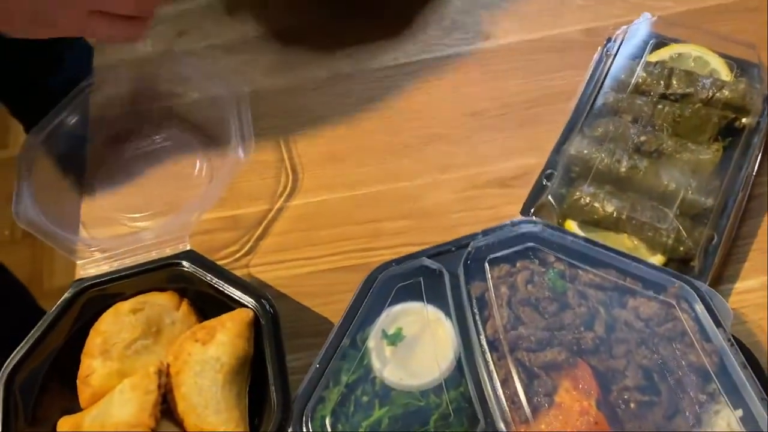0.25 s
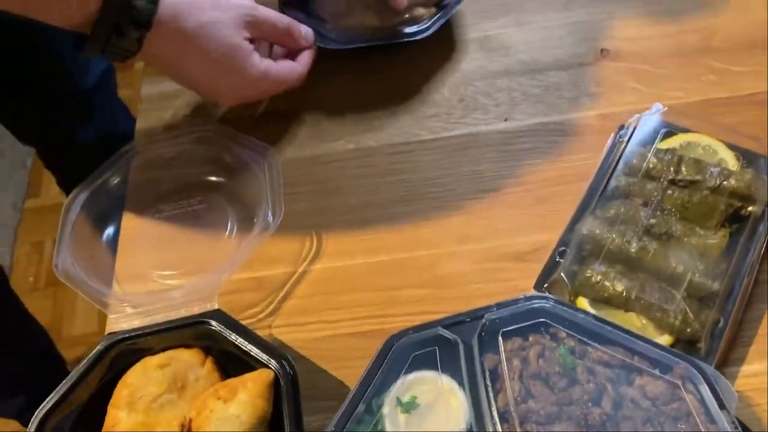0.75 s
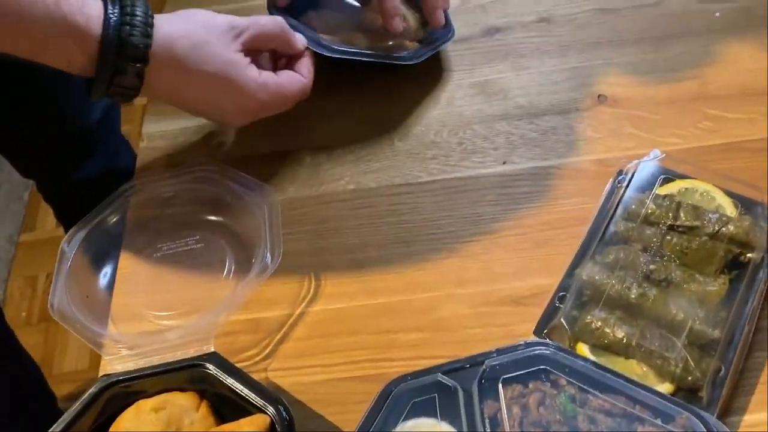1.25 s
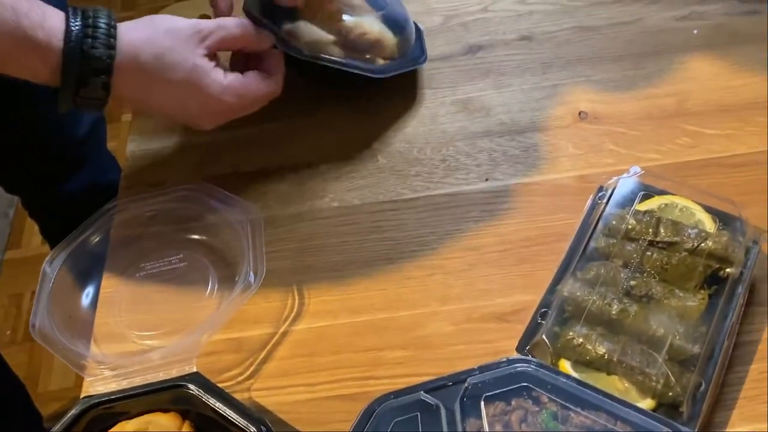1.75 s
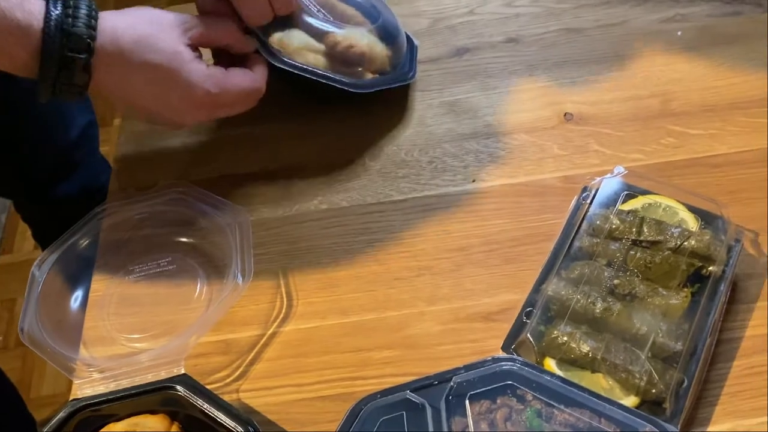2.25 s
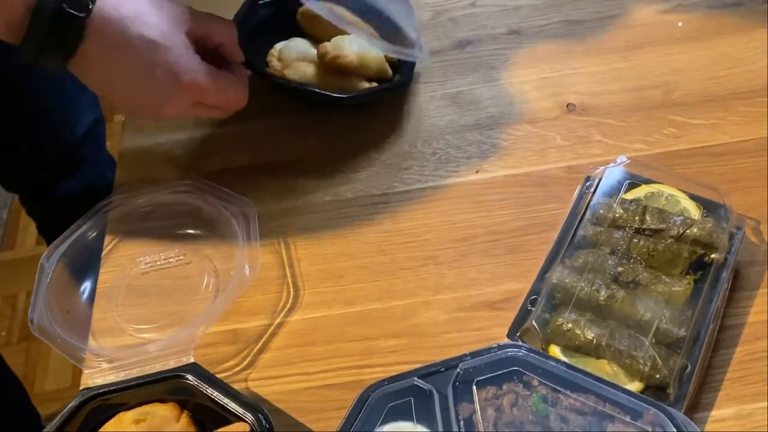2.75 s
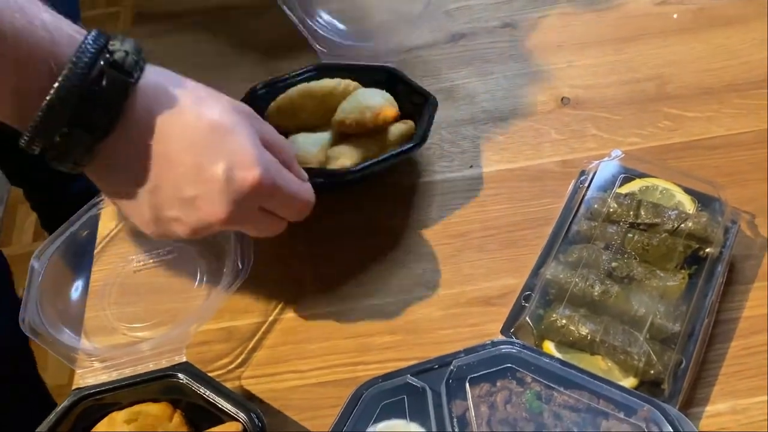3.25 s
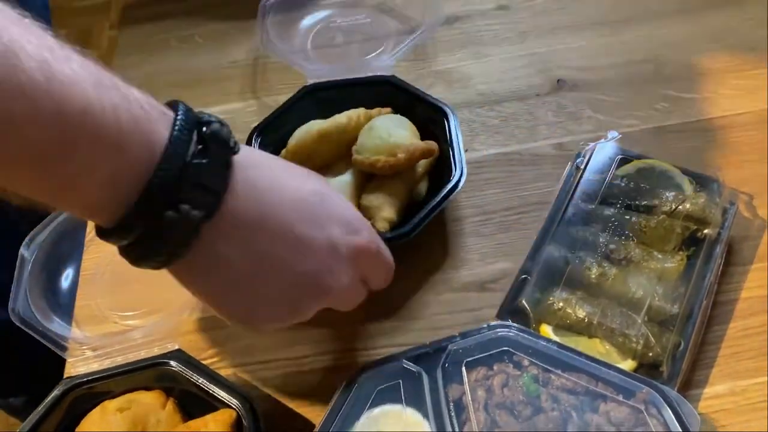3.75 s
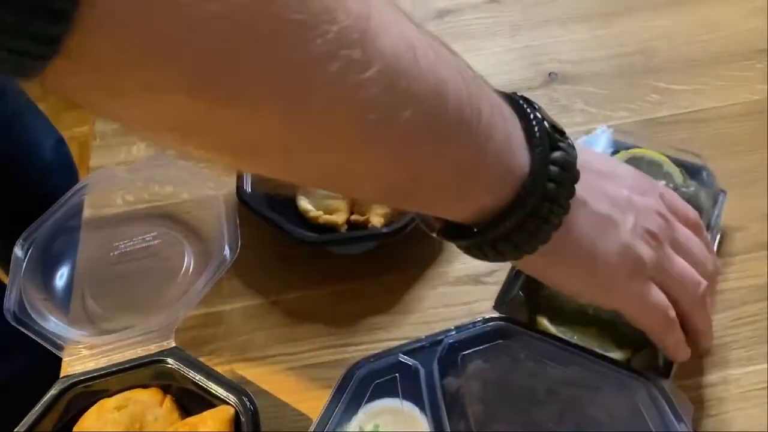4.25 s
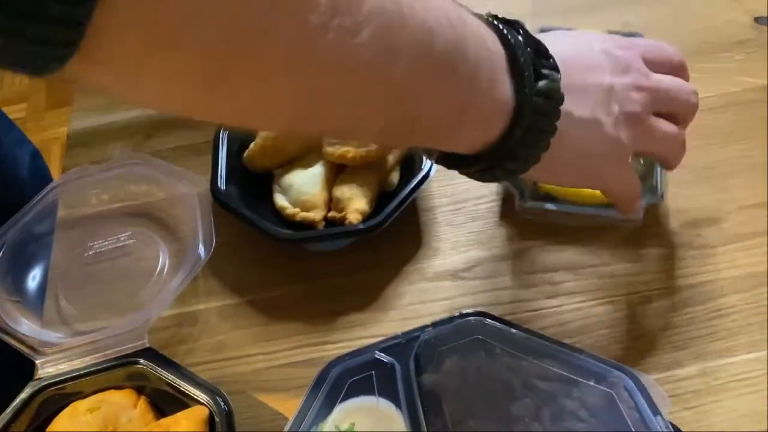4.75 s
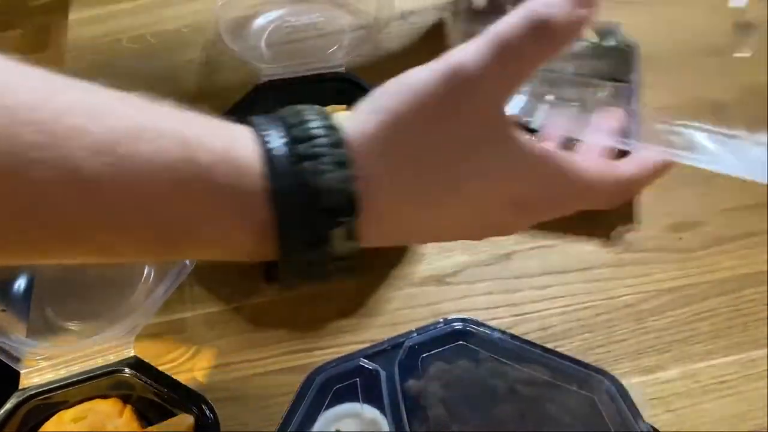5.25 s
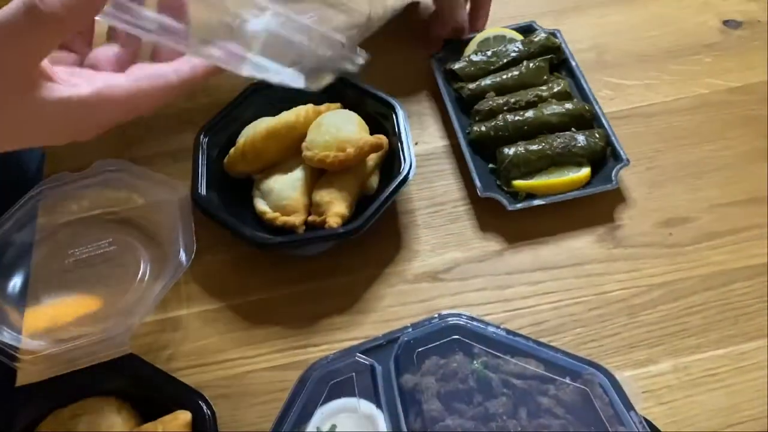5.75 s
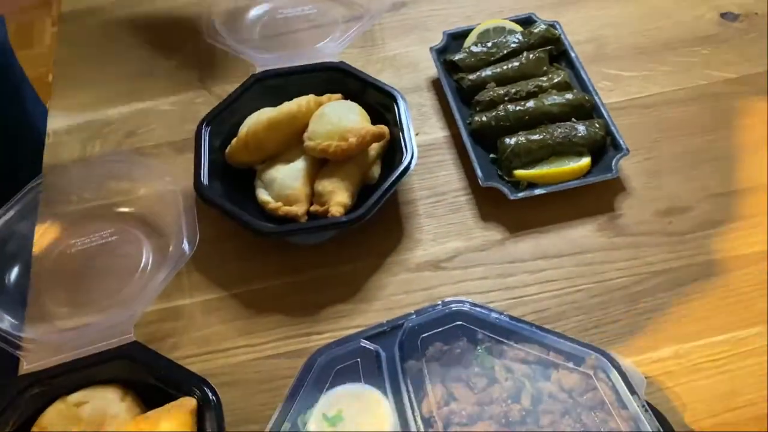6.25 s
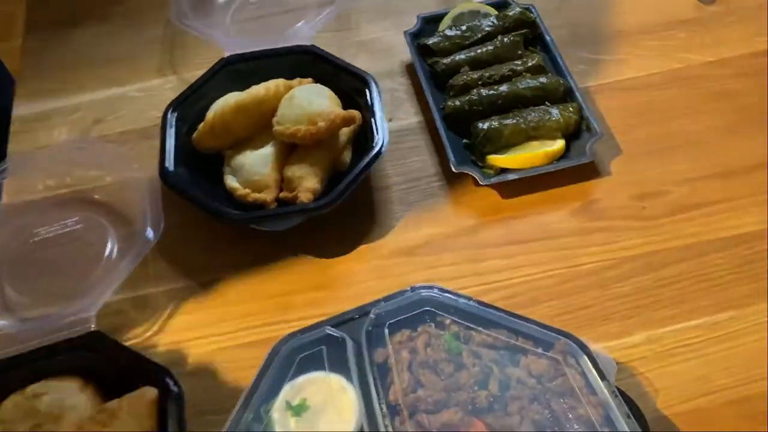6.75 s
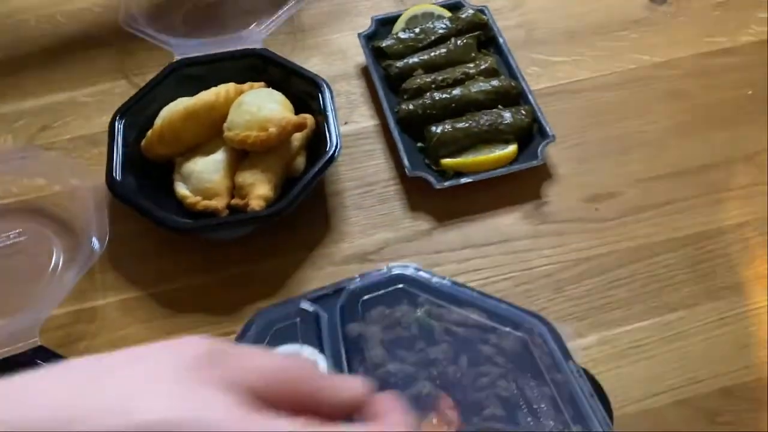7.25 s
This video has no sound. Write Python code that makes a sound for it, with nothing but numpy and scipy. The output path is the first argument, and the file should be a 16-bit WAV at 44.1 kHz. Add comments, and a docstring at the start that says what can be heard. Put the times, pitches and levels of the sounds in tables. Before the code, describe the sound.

Thin plastic food boxes crackle, snap open and knock on a wooden table, heard close in a quiet room.

```python
"""In a living room, thin plastic food boxes are slid, squeezed and opened on a wooden table.
Boxes thud on the table top and rub over the wood in many tiny slips; the plastic knocks, creaks
and sings. Lids buckle under a thumb and snap free, and a dropped lid bounces. Each blow sets
the thin plastic ringing. Two close microphones pick it all up over a faint room hush."""
import sys
import numpy as np
from scipy import signal
from scipy.fft import rfft, irfft, next_fast_len
from scipy.io import wavfile
from scipy.ndimage import uniform_filter1d

SR = 44100
rng = np.random.default_rng(int(sys.argv[2]) if len(sys.argv) > 2 else 0)


def unload_wav(signal):
    """Save mono or channel-first audio to the path in sys.argv[1] as 16-bit WAV at rate SR, clipped to [-1, 1]."""
    wavfile.write(
        sys.argv[1],
        SR,
        np.round(np.clip(np.atleast_2d(signal).T, -1, 1) * 32767).astype(np.int16),
    )


N = 330608


def from_db(db):
    """Turn decibels into a gain."""
    return 10 ** (np.asarray(db) / 20)


def rms_one(x):
    """Scale a signal so its average strength (rms) is 1."""
    return x / np.sqrt(np.mean(x ** 2) + 1e-20)


def peak_one(x):
    """Scale a signal so its highest peak is 1."""
    return x / (np.abs(x).max() + 1e-20)


def at_hz(points, hz):
    """Read between a table's rows, with octaves about evenly spaced."""
    points = np.array(points, float)
    return np.interp(np.log(hz + 1), np.log(points[:, 0] + 1), points[:, 1])


def high_pass(x, hz, order=2):
    """Turn down everything below hz."""
    return signal.sosfilt(signal.butter(order, hz, "high", fs=SR, output="sos"), x)


def coloured(x, spectrum):
    """Shape a signal's tone with a table of frequencies and levels."""
    log_gain = np.log(from_db(at_hz(spectrum, np.fft.rfftfreq(8192, 1 / SR))))
    cepstrum = irfft(log_gain)
    cepstrum[1:4096] *= 2   # folded so the filter never sounds ahead of its input
    cepstrum[4097:] = 0
    return signal.fftconvolve(x, irfft(np.exp(rfft(cepstrum))))[:len(x)]


def ring(x, hz, t60):
    """Let x set one pitch ringing; t60 is the ring time, the seconds it takes to fade by 60 dB."""
    decay = from_db(-60 / (max(t60, .002) * SR))
    step = 2 * np.pi * hz / SR
    return signal.lfilter([0, np.sin(step)], [1, -2 * decay * np.cos(step), decay * decay], x + 1e-18)


def add(track, s, sound):
    """Mix a sound into the track, starting at s seconds."""
    i = int(s * SR)
    track[i:i + len(sound)] += sound[:N - i]


def opposed(x, share):
    """Widen the sound: a weak copy without bass, upside down on the right."""
    return share * high_pass(x, 240) * np.array([[1], [-1]])


# Notes of the table top, the box hollows and a loose lid, by name: f/Hz, ring time/s
BODY_NOTES = {"deep": (46, 0.2), "low": (64, 0.079), "middle": (119, 0.14), "high": (248, 0.19),
              "thump": (185, 0.09), "hollow": (335, 0.061), "box": (310, 0.19), "tub": (390, 0.16),
              "rim": (550, 0.1), "lid": (2250, 0.15), "flap": (2430, 0.2)}
# Boxes set down or pressed, and what rings on: t/s, level/dB, note name
BOOMS = [(0.17, -27.5, "hollow"), (0.525, -25, "hollow"), (0.46, -32.5, "middle"), (0.511, -20.5, "middle"),
         (0.549, -17.5, "middle"), (0.599, -20.5, "deep"), (0.61, -32, "middle"), (0.701, -26.5, "deep"),
         (0.58, -23, "high"), (1.538, -33.5, "high"), (1.71, -36, "high"), (1.757, -32, "high"),
         (2.12, -24, "box"), (0.999, -33.5, "high"), (0.812, -37.5, "rim"), (2.135, -35, "flap"),
         (2.25, -34.5, "flap"), (2.24, -27, "tub"), (3.682, -35, "deep"), (3.788, -35.5, "middle"),
         (3.851, -34, "deep"), (0.0, -25, "deep"), (2.164, -23.5, "box"), (2.349, -19, "hollow"),
         (2.116, -22, "lid"), (2.234, -22.5, "lid"), (2.6, -8, "hollow"), (2.599, -14, "thump"),
         (4.278, -35.5, "deep"), (4.3, -30, "hollow"), (4.34, -29, "hollow"), (4.754, -12.5, "hollow"),
         (4.761, -15, "thump"), (4.79, -25, "middle"), (4.782, -16, "deep"), (5.467, -23.5, "low"),
         (5.727, -33.5, "low"), (6.603, -32, "middle"), (6.699, -30, "high"), (7.307, -25, "high")]

def booms():
    """A soft push sets table top, box or lid swinging at one pitch; loose contact makes it uneven."""
    out, t = np.zeros(N), np.arange(20000) / SR
    swell_cycles, uneven_db = 0.88, 2.5
    for s, db, note in BOOMS:
        hz, t60 = BODY_NOTES[note]
        smoothing = int(min(2.7 / hz, .05) * SR) + 40
        wobble = rms_one(uniform_filter1d(rng.standard_normal(len(t)), size=smoothing))
        level = from_db(db - 60 * t / t60 + uneven_db * wobble)
        swell = 1 - np.exp(-t * hz / swell_cycles)
        add(out, s, level * swell * np.sin(2 * np.pi * hz * t))
    return out


# Notes of the thin box walls: f/Hz, level/dB, ring time/s (capped at 0.03 below)
WALL_NOTES = [(600, -19.5, 0.019), (690, -10, 0.036), (823, 7, 0.015), (1177, 16, 0.006),
              (1337, 16.5, 0.0053), (1540, 9, 0.0034), (1654, 8, 0.0049), (2175, 11, 0.0027),
              (2240, -5.5, 0.0033), (2880, 7.5, 0.003), (3303, 9, 0.0052), (3635, 2, 0.00612)]

def box_walls(push, chance):
    """The walls ring at many notes; two rows of chance vary their strength and, like a grip, pitch."""
    scatter_db, bend = 1.2, .07
    out = 0
    for k, (hz, db, t60) in enumerate(WALL_NOTES):
        gain = (-1) ** k * from_db(db + scatter_db * chance[0, k])
        out = out + gain * ring(push, hz * (1 + bend * chance[1, k]), min(t60, .03))
    return out


# Tone of the rumbling wood: f/Hz, level/dB
WOOD_TONE = [(18, -60.5), (30, -5.5), (86, -9.5), (247, -5.5), (524, -4), (700, -8), (910, -17),
             (1540, -120)]
# Tone of fingers hissing over plastic: f/Hz, level/dB
FINGER_TONE = [(1400, -30), (2800, 1.5), (4300, 1), (5400, 4), (7300, -5), (9500, -3.5), (13500, -7),
               (17000, -17)]
# Rubs and creases: start t/s, end t/s, first level/dB, last level/dB, panel f/Hz,
# wood level/dB, finger level/dB (these two relative to the stroke)
STROKES = [(0, 0.095, -26, -33, 1770, -5.5, -10.5), (0.115, 0.472, -32.5, -60.5, 1216, -4, -7),
           (0.458, 0.706, -51.5, -51.5, 900, 5, -7), (0.72, 0.9, -57.5, -53.5, 2460, -1.5, -6.5),
           (0.911, 1, -51.5, -55, 1410, 4, -10), (0.997, 2.11, -53, -55.5, 2270, -4, -8),
           (1.64, 1.689, -43, -45, 860, -5, -3.5), (1.714, 1.756, -46.5, -33.5, 800, -17, -14.5),
           (2.127, 2.58, -29, -63.5, 2500, -16.5, -18), (2.922, 3.218, -58, -46.5, 2500, -20, -4),
           (1.166, 1.199, -35, -50, 925, -13, -33), (3.309, 3.459, -44, -56.5, 2120, -11, -1.5),
           (3.464, 3.544, -60, -55.5, 2295, -24, -1.5), (3.551, 3.69, -46.5, -57.5, 2220, -16.5, -3),
           (4.195, 4.27, -47, -56.5, 1400, -1.5, -8.5), (4.256, 4.358, -47.5, -37.5, 1430, -3, -2.5),
           (4.362, 4.435, -37.5, -37.5, 754, -6, -6), (4.43, 4.578, -40, -55, 1560, -8.5, 2.5),
           (4.543, 4.613, -33, -51.5, 1032, -7, -9.5), (4.564, 4.751, -38.5, -46.5, 1254, -7.5, -7.5),
           (5.333, 5.42, -58.5, -51.5, 3100, -13.5, -4.5), (5.428, 5.495, -47, -47.5, 2240, -23.5, -8),
           (5.398, 5.703, -58, -64, 5286, -16, 4), (5.503, 5.716, -55.5, -61, 1816, -19, 0),
           (6.667, 7.004, -69, -52, 2420, -1.5, -16), (6.084, 6.194, -57.5, -66, 2780, -3, -9.5),
           (7.025, 7.104, -44, -41.5, 790, -6, -6.5), (7.136, 7.303, -52.5, -44.5, 770, 10, -0.5),
           (7.306, 7.517, -42, -49.5, 770, 10.5, -5.5)]

def rubbing(rattle_strokes):
    """Tiny slips shake the walls and the panel (the plastic under the hand); wood rumbles, skin hisses."""
    slips_per_s, ring_cycles = 1500, 13
    sizes = from_db(0.82 * np.minimum(rng.exponential(1, N), 5)) * rng.choice([-1, 1], N)
    surges = rms_one(uniform_filter1d(rng.standard_normal(N), size=900))   # the grip catches and lets go
    slips = rms_one(sizes * (rng.random(N) < slips_per_s / SR) * from_db(1.6 * surges))
    walls = rms_one(high_pass(box_walls(slips, np.zeros((2, len(WALL_NOTES)))), 490))
    rumble = rms_one(coloured(rng.standard_normal(N), WOOD_TONE))
    skin = rms_one(coloured(rng.standard_normal(N) * from_db(2.0 * surges) + 0.061 * slips, FINGER_TONE))
    out = np.zeros(N)
    # Rattles swell faster than rubs and leave the table's bass still.
    for strokes, swell_s, bass_cut_hz in [(STROKES, 0.02, 40), (rattle_strokes, 0.0035, 130)]:
        for start, end, first_db, last_db, hz, wood_db, finger_db in strokes:
            t = np.arange(-.006, max(end - start, .01) + 0.022, 1 / SR)
            part = slice(int(start * SR), int(start * SR) + len(t))
            t = t[:len(slips[part])]
            level = from_db(np.interp(t, [0, end - start], [first_db, last_db]))
            fade_in = (t - t[0]) / swell_s if start > .01 else 1
            fades = np.clip(np.minimum(fade_in, (t[-1] - t) / 0.027), 0, 1)
            panel = rms_one(high_pass(ring(slips[part], hz, ring_cycles / hz), 0.42 * hz))
            upper_walls = high_pass(high_pass(walls[part], 0.43 * hz), 0.43 * hz)
            wood = from_db(wood_db) * high_pass(rumble[part], bass_cut_hz)
            mix = 0.7 * panel + 0.59 * upper_walls + wood + from_db(finger_db) * skin[part]
            add(out, max(start - .006, 0), level * fades * mix)
    return out


# Singing plastic, one list of points for each sound: t/s, level/dB, f/Hz
SINGING_CURVES = [
    [(0, -27, 1080), (0.07, -29.5, 1190), (0.11, -37, 1150), (0.26, -56, 1100)],
    [(2.99, -67, 1850), (3.05, -49, 2050), (3.12, -51, 2350), (3.17, -47.5, 2150), (3.205, -43, 1850),
     (3.24, -61, 1800)],
]
# The bands it sings in: multiple of the pitch, level/dB
SINGING_BANDS = [(1, 1), (1.85, -7.5), (2.8, -12)]

def singing_plastic():
    """Plastic sings in narrow bands of noise: a fading ring at the start, later a gliding scrape."""
    out = np.zeros(N)
    half_width = 0.108   # as a share of the band's pitch
    for points in SINGING_CURVES:
        s, db, hz = np.transpose(points)
        t = np.arange(s[0], s[-1], 1 / SR)
        phase = 2 * np.pi * np.cumsum(np.interp(t, s, hz)) / SR
        for multiple, band_db in SINGING_BANDS:
            blur = signal.butter(2, half_width * multiple * hz.mean(), fs=SR, output="sos")
            sway = rms_one(signal.sosfilt(blur, rng.standard_normal((2, SR)))[:, -len(t):])
            band = sway[0] * np.cos(multiple * phase) + sway[1] * np.sin(multiple * phase)
            add(out, s[0], from_db(np.interp(t, s, db) + band_db) * band)
    return out


# Tone of the quiet room: f/Hz, level/dB
HUSH_TONE = [(25, -23), (45, -0.5), (160, 0.5), (500, -14), (900, -18), (2500, -27), (6000, -37.5),
             (10000, -37), (17000, -43)]
# Faint steady whines in it: f/Hz, level/dB
WHINES = [(830, -75.5), (1700, -83)]

def hush():
    """Steady low room noise with a faint whine, nearly alike left and right."""
    common, opposite = (rms_one(coloured(rng.standard_normal(N), HUSH_TONE)) for _ in range(2))
    noise = rng.standard_normal(N)
    whine = sum(from_db(db) * rms_one(ring(noise, hz, t60=0.82)) for hz, db in WHINES)
    return from_db(-56) * (common + opposed(opposite, 0.077)) + whine


# Tone of the bright crack of plastic: f/Hz, level/dB
CRACK_TONE = [(700, -41.5), (2000, -7.5), (3800, 11.5), (5200, 16.5), (7300, 6), (10000, 4.5),
              (12000, -1.5), (13500, 1.5), (15200, -10.5), (17000, -16)]

def blow(hz, crack_db, contact_ms, thud_db):
    """One click with ragged aftershocks drives the panel, the walls, a brief crack and a low thud."""
    ms = np.arange(4000) / SR * 1000
    fading = np.exp(-ms / contact_ms)
    hardness = from_db(0.3 * min(crack_db, 0))   # soft blows swell slowly and mostly wake the panel
    crispness = min(3.17 / contact_ms, 1) ** 2   # past 3.17 ms, a click turns into a crunch
    swell = np.minimum(ms * hardness * crispness / 0.28, 1)
    push = rng.standard_normal(len(ms)) * swell * fading
    push[20] += 8.8 * (hardness * crispness) ** 2   # the click itself
    contact = high_pass(push, 250)
    panel = peak_one(high_pass(ring(contact, hz, 3.6 / hz / hardness), 0.74 * hz))
    wall_push = high_pass(contact, .62 * hz, order=6)   # a small panel wakes no deep notes
    walls = peak_one(box_walls(wall_push, rng.standard_normal((2, len(WALL_NOTES)))))
    crack = peak_one(coloured(contact * (fading ** 0.3 + 0.5 * fading ** 1.6), CRACK_TONE))
    thud = peak_one(ring(ring(high_pass(push, 150), 400, 0.0018), 290, 0.0028))
    plastic = 0.61 * panel + 1.245 * hardness ** 2 * walls + from_db(crack_db) * crack
    return plastic + from_db(thud_db) * thud


# Knocks, crunches and creaks: t/s, level/dB, panel f/Hz, crack level/dB, contact time/ms
KNOCKS = [(0.456, -33.5, 634, -63, 3.5), (0.48, -32.5, 825, -19, 1.9), (0.142, -33, 4380, -8, 3.3),
          (0.207, -24.5, 2250, -15, 17), (0.5, -40.5, 1490, -0.5, 10.6), (0.978, -21.5, 1490, -20, 14),
          (0.995, -8, 880, -25, 1.4), (1.364, -14, 760, -22, 0.53), (2.233, -10, 840, -22.5, 4.6),
          (2.118, -8.5, 770, 6, 3.6), (2.164, -11, 1700, 3.5, 3), (2.244, -18.5, 2220, 9.5, 4.3),
          (2.351, -10.5, 2120, 3.5, 3.63), (2.352, -13.5, 810, -25, 2.2), (2.363, -26, 2370, -41, 4.5),
          (2.57, -28.5, 790, -8, 14), (2.598, -12.5, 1760, 5.5, 7.1), (2.602, 0.5, 486, -18, 8.2),
          (2.611, -13.5, 1330, -2, 19.6), (2.623, -4, 786, -26, 1.8), (2.636, -20.5, 846, -4, 18),
          (2.721, -7.5, 2090, -7, 11), (2.728, -4.5, 4850, -15.5, 5.5), (3.305, -29, 1840, -53.5, 4.3),
          (3.661, -21.5, 3080, -23, 14), (4.206, -24.5, 993, -15, 7.1), (4.301, -24, 1240, -16.5, 1.7),
          (4.331, -49, 1890, -16, 3.5), (4.367, -27, 1850, -16, 6.2), (4.446, -21, 1890, -14.5, 4.8),
          (4.453, -20.5, 2080, -13, 1.6), (4.461, -21, 1640, -10, 4.4), (5.149, -55.5, 2580, 2, 8.7),
          (5.537, -39, 5340, -8, 5.1), (5.616, -39, 1080, -19, 3.4), (6.585, -30, 2470, -24.5, 4.9),
          (6.728, -35, 2950, 0, 4.3), (7.307, -25, 700, -19, 5.5), (4.723, -9.5, 1010, -22.5, 10.7),
          (4.73, -10, 860, -26, 1.7), (4.755, -4, 870, -12, 3.1), (4.763, -5.5, 1220, -51.5, 3.9),
          (5.258, -40.5, 625, -24, 8), (6.097, -48, 2680, 1.5, 8.3), (6.344, -48.5, 1060, 1, 10.3),
          (6.592, -3.5, 1410, -12.5, 5), (6.592, -16.5, 3150, -25.5, 12.7), (6.602, -8.5, 2400, -25, 7.6),
          (6.612, -10, 1480, -32, 6.8), (6.681, -17.5, 2500, -18, 9), (6.756, -32.5, 2260, -10.5, 14),
          (6.841, -21, 2730, -11.5, 6.6), (6.935, -32.5, 4300, 7.5, 9.2), (7.029, -21.5, 596, -36, 1.5),
          (7.049, -26, 704, -30, 3.3), (7.089, -24.5, 2330, 4, 3.9), (7.151, -25, 1770, -5.5, 8.9),
          (7.262, -24.5, 1410, -20, 11.4), (7.357, -31.5, 600, 6.5, 5.2)]

def knocks_and_creaks():
    """Plastic knocks, crunches, or creaks briefly just before a snap, each with a low thud."""
    out = np.zeros(N)
    for s, db, hz, crack_db, contact_ms in KNOCKS:
        add(out, s, from_db(db) * blow(hz, crack_db, contact_ms, thud_db=-15.5))
    return out


def rattles(blows, relative_db):
    """Loose plastic rattles on after each blow; returns fading strokes for rubbing() to play."""
    fade_db, wood_db, finger_db = -47, 2, -10
    return [(s + 0.0056, s + 0.32, db + relative_db, db + relative_db + fade_db, hz, wood_db, finger_db)
            for s, db, hz, *_ in blows]


# A lid giving way: t/s, level/dB
BUCKLES = [(0.92, -36), (1.038, -24), (1.203, -29.5), (1.482, -14), (1.491, -11), (1.501, -11.5),
           (1.852, -13), (1.961, -28), (2.076, -19.5), (2.094, -16.5), (2.105, -11.5), (2.465, -32.5),
           (4.366, -27)]

def buckles():
    """A lid panel buckles softly under the thumb."""
    out = np.zeros(N)
    for s, db in BUCKLES:
        add(out, s, from_db(db) * blow(hz=905, crack_db=-22, contact_ms=6.5, thud_db=-44))
    return out


# A lid rim letting go: t/s, level/dB, panel f/Hz, crack level/dB
SNAPS = [(0.991, -6, 2040, 4.5), (1.158, -37.5, 3540, 9), (1.26, -56.5, 3970, 12.5), (1.29, -43.5, 670, 18),
         (1.353, -6, 1120, 5), (1.866, -6, 1170, 0.5), (2.233, -6.5, 5060, -11), (3.674, -4, 2790, 0),
         (5.36, -43, 2220, 17)]

def snaps():
    """A lid rim snaps free in the hand, with a sharp crack and hardly any thud."""
    out = np.zeros(N)
    for s, db, hz, crack_db in SNAPS:
        add(out, s, from_db(db) * blow(hz, crack_db, contact_ms=2.5, thud_db=-34.5))
    return out


# Landings of a dropped lid: t/s, level/dB
BOUNCES = [(3.786, -14.5), (3.848, -14.5), (3.888, -18), (3.917, -27)]

def bounces():
    """A dropped lid bounces on its rim in short taps that come ever closer together."""
    out = np.zeros(N)
    for s, db in BOUNCES:
        add(out, s, from_db(db) * blow(hz=1890, crack_db=-13, contact_ms=1.6, thud_db=-18.5))
    return out


# How long the room rings: f/Hz, ring time/s
ROOM_RING = [(100, 0.65), (300, 0.41), (800, 0.22), (2000, 0.39), (5000, 0.16), (13000, 0.13)]

def room(x):
    """Echoes off the room's walls blur into a tail of noise, each octave dying at its own pace."""
    t, edges_hz = np.arange(SR // 2) / SR, 60 * 2.0 ** np.arange(9)
    tail = 0
    for low, high in zip(edges_hz, edges_hz[1:]):
        octave = signal.butter(2, [low, high], "band", fs=SR, output="sos")
        band = signal.sosfilt(octave, rng.standard_normal((2, len(t))))
        tail = tail + band * from_db(-60 * t / at_hz(ROOM_RING, np.sqrt(low * high)))
    tail *= np.clip((t - .004) / 0.00087, 0, 1)   # the first wall is a few milliseconds away
    tail /= np.sqrt(np.sum(tail[0] ** 2))
    common, opposite = signal.fftconvolve(x[None], tail, axes=1)[:, :N]
    return from_db(-14) * (common + opposed(opposite, .65))


def scene():
    """Add up the boxes on the table, their echo and the room's hush."""
    rattle_strokes = rattles(KNOCKS, relative_db=-35.5) + rattles(SNAPS, relative_db=-42.5)
    close = booms() + rubbing(rattle_strokes) + singing_plastic()
    close += knocks_and_creaks() + buckles() + snaps() + bounces()
    return close + hush() + room(close)


# How far the left microphone's wave runs ahead of the right: f/Hz, phase/radians
LEFT_LEAD = [(0, 0), (600, -0.4), (1000, 0), (2410, 0.2), (3450, 1.6), (5080, 0.3), (6980, 2.8),
             (10900, 6.7), (16600, 12.5)]
# How much louder the left one is: f/Hz, level/dB
LEFT_BALANCE = [(100, 0), (380, .4), (700, -3.3), (1300, -1), (2400, -2.8), (5000, -.9), (10000, .8)]

def record(dry):
    """Two microphones differ in timing and level; peaks are rounded and the highest treble is cut."""
    size = next_fast_len(N + 2048)
    hz = np.fft.rfftfreq(size, 1 / SR)
    lead = np.interp(hz, *np.transpose(LEFT_LEAD))
    left = from_db(at_hz(LEFT_BALANCE, hz) / 2) * np.exp(.5j * lead)   # the right gets the inverse
    stereo = irfft(rfft(dry, size) * np.array([left, 1 / left]), size)[:, :N]
    gain, ceiling, cutoff_hz = 1.258, .92, 16750
    rounded = ceiling * np.tanh(gain * stereo / ceiling)
    treble_cut = signal.ellip(10, rp=.5, rs=70, Wn=cutoff_hz, fs=SR, output="sos")
    return signal.sosfilt(treble_cut, rounded)


dry = scene()
out = record(dry)
unload_wav(out)
```